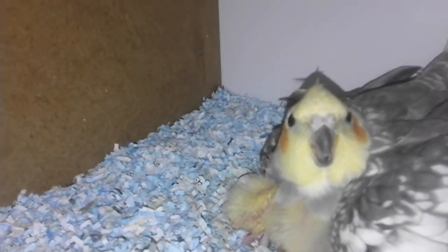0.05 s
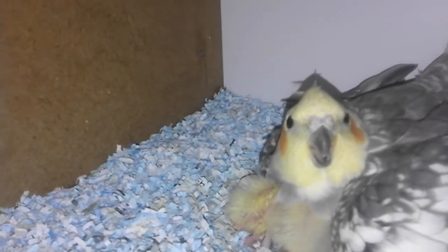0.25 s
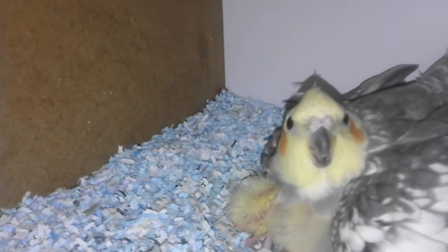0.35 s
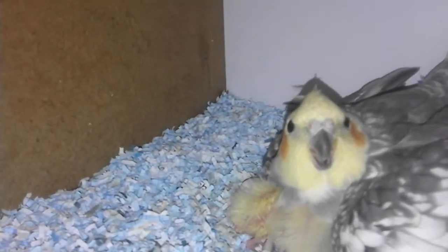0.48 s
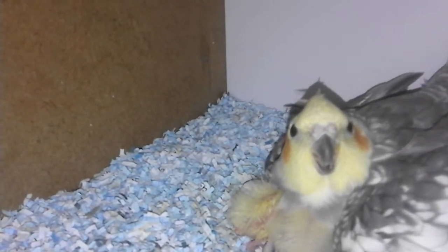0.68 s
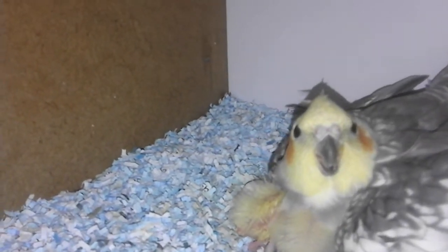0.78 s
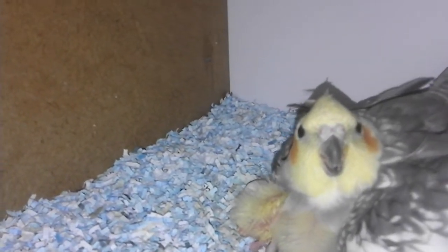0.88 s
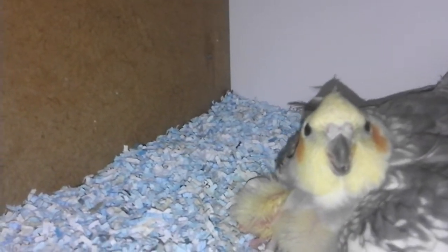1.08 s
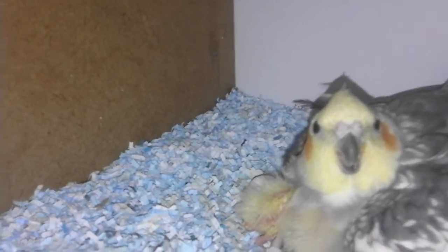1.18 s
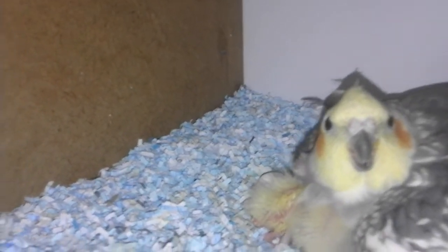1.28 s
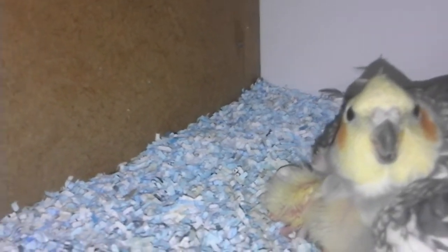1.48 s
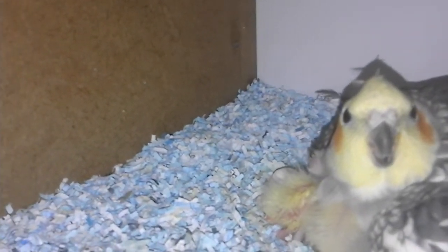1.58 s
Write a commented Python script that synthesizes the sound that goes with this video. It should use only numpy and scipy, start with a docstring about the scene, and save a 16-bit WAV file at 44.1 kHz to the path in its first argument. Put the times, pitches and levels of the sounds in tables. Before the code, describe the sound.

A cockatiel squawks harshly three times, close by in a wooden nest box. The second squawk is the longest and loudest and opens into a raspy hiss; the third is softer. A faint low hum wavers underneath.

```python
"""A low, wavering hum, and over it a cockatiel squawks three times, close by, in a wooden nest box.
One side of its voice organ, the syrinx, flutters wildly around a pitch that first rises.
In the first two squawks the other side adds a thin whistle above it. The long second squawk opens
into a raspy hiss of air through the beak. Bedding rustles faintly as the bird shifts,
and the box and the room ring on after each sound."""
import sys
import numpy as np
from scipy import signal
from scipy.fft import rfft, irfft
from scipy.io import wavfile
from scipy.ndimage import map_coordinates

SR = 44100
rng = np.random.default_rng(int(sys.argv[2]) if len(sys.argv) > 2 else 0)


def wav_out(sig):
    """Save sig, one row per channel (or a flat mono array), as 16-bit PCM at SR to the path in sys.argv[1]."""
    wavfile.write(sys.argv[1], SR, np.round(np.clip(np.atleast_2d(sig).T, -1, 1) * 32767).astype(np.int16))


N = 72765
T = np.arange(N) / SR

# The hum's loudness. Each row: time in seconds, level in dB.
HUM_LEVELS = [(0.0, -61), (0.174, -54.5), (0.274, -64.5), (0.412, -52.5), (0.542, -52), (0.684, -59.5),
              (0.812, -49.5), (0.946, -50), (1.116, -69), (1.268, -53.5), (1.392, -52.5), (1.442, -67),
              (1.57, -54.5), (1.65, -57)]
# Steady room noise, then a low noise that swells. Each row: frequency in Hz, relative level in dB.
ROOM_NOISE_COLOUR = [(25, -52), (45, 0), (65, -4.5), (82, -17), (100, 1), (120, -25), (145, -3.5),
                     (250, -1.5), (330, -11.5), (560, -13.5), (750, -21.5), (1200, -22), (2100, -15),
                     (3300, -71), (4200, -19.5), (5500, -51), (15500, -27)]
SWELL_NOISE_COLOUR = [(30, -18), (48, -22), (65, 3.5), (130, 3.5), (220, -0.5), (320, -9.5), (560, -3),
                      (1000, -8.5), (2000, -19), (12000, -28)]
# The swelling noise's loudness. Each row: time in seconds, level in dB.
SWELL_LEVELS = [(0, -64), (.2, -57.5), (.55, -54), (.92, -52), (1.12, -62.5), (1.35, -57), (1.65, -58)]
# The harsh voice, one list per squawk. Each row: time in seconds, pitch in Hz,
# flutter reach to either side in Hz, level in dB, overtone gain in dB.
SQUAWK_PATHS = [
    [(.168, 1500, 129.2, -54, -7), (.186, 1760, 160.1, -43.5, -8), (.215, 2020, 269.5, -39.5, -12),
     (.25, 2290, 420, -41.5, -12.5), (.295, 2290, 418, -44.5, -14.5), (.325, 2200, 284.2, -35, -24),
     (.36, 2190, 276, -36, -14), (.41, 2175, 248, -40, -13.5), (.44, 2076, 298, -53, -9)],
    [(.445, 1680, 221, -53.5, 7), (.468, 1850, 218.8, -42, 6), (.506, 1950, 259.7, -33, -5.5),
     (.512, 2158, 251, -30.5, -20), (.545, 2286, 397.2, -27.5, -34), (.59, 2390, 537.1, -36, -21),
     (.655, 2240, 397.3, -31, -23), (.76, 2230, 441.5, -34, -3), (.785, 1900, 221.2, -34.5, -21),
     (.828, 1901, 239, -34, -23), (.87, 2100, 454.3, -42, -3), (.98, 2021, 378, -52, -37)],
    [(1.229, 1837, 119.8, -55, -7.5), (1.25, 1853, 119.6, -44, -6), (1.263, 1988, 140.5, -39.5, -8.5),
     (1.29, 2073, 219.7, -41.5, -11), (1.335, 2296, 469.7, -41, -18), (1.385, 2327, 475.5, -45, -13),
     (1.43, 2293, 462, -52.5, -25)],
]
# Each row is one squawk's tone: change from one overtone to the next in dB, gain of its air in dB.
SQUAWK_TONES = [(-1.5, -30), (-8.5, -23.5), (-8, -29)]
# How the throat and open beak colour the overtones. Each row: frequency in Hz, gain in dB.
THROAT_COLOUR = [(2800, 4.5), (3300, -7), (3650, -0.5), (4200, 1), (4600, 1.5), (5100, -1.5), (5450, 2.5),
                 (5750, -7), (6050, -3), (6400, -2.5), (7300, -11.5), (9500, -18.5), (11200, -13.5),
                 (12000, -29), (13200, -23), (14600, -16), (17000, -32)]
# Air rushing out with the voice. Each row: frequency in Hz, relative level in dB.
AIR_COLOUR = [(300, -15), (550, 10.5), (750, -32), (1000, 16), (1400, 0), (2500, 16.5), (3300, -30),
              (4000, 6), (6000, 1), (8000, -11), (11500, -2), (15500, -8)]
# One list per whistle. Each row: time in seconds, pitch in Hz, flutter reach in Hz, level in dB.
WHISTLE_PATHS = [
    [(.236, 2700, 150.4, -48), (.258, 2960, 89.6, -33.5), (.275, 2977, 52, -31.5), (.3, 3022, 106.4, -40.5),
     (.345, 3010, 140, -48.5), (.38, 3130, 183, -44), (.41, 3098, 212, -41), (.445, 3100, 200, -54)],
    [(.53, 2520, 129.9, -58), (.572, 2850, 109.4, -34), (.597, 2880, 83.5, -29.5), (.63, 2800, 216, -52.5),
     (.71, 2780, 225, -39), (.79, 2600, 276, -55), (.85, 2900, 259.4, -42.5), (.885, 2920, 232, -44.5),
     (.94, 2850, 253, -71)],
]
# Rustles of bedding. Each row: time of the peak in seconds, fade time in seconds, level in dB.
BEDDING_RUSTLES = [(0.474, 0.026, -54.5), (1.437, 0.0052, -68), (1.558, 0.008, -68.5), (1.602, 0.017, -64)]
# The hiss. Each row: time in seconds, main beak resonance in Hz, level in dB.
HISS_PATH = [(.668, 3937, -61), (.69, 4074, -47.5), (.73, 4350, -48), (.775, 4646, -43),
             (.825, 4376, -39.5), (.86, 4415, -45), (.92, 4430, -54.5), (1.0, 4300, -92)]
# The hiss's peaks. Each row: ratio to the main resonance, width in Hz, relative level in dB.
BEAK_PEAKS = [(.91, 450, 1), (1, 586, 0.5), (1.109, 448, -2.5), (1.401, 1600, -11)]
# A hollow puff as the hiss begins. Each row: time in seconds, resonance in Hz, level in dB.
PUFF_PATH = [(.675, 1404, -51), (.7, 1154, -56.5), (.735, 845, -57.5), (.78, 803, -69)]
# Low notes of the box. Each row: pitch in Hz, seconds to fade by 60 dB, gain at that pitch in dB.
BOX_NOTES = [(548.4, 0.11, 12.5), (718, 0.25, 6)]

HUM_HZ, DRONE_HZ, DRONE_DB, ROOM_NOISE_DB = 173, 67, -63, -65.5
FLUTTER_DEPTH = 0.65  # how far the strength follows the flutter, from 0 to 1
RATTLE_HZ, HISS_RATTLE_DB = 103, 2  # fast, uneven shaking of the loudness
THROB_HZ, THROB_DB = 44, 1  # slower, uneven heaves of the voice
ONSET_AIR_DB, ONSET_AIR_S = 8, 0.033  # each squawk starts with extra air
BOX_ECHO_DB, ROOM_ECHO_DB = -3, -2.5
TREBLE_LIMIT_HZ = 15700


def gain(db):
    """Turn decibels into a number to multiply by."""
    return 10 ** (np.asarray(db) / 20)


def unit(x):
    """Scale a signal to an average power of 1."""
    return x / np.sqrt(np.mean(x ** 2))


def curve(rows, column=1):
    """Join the rows of a table by straight lines in time."""
    rows = np.array(rows)
    return np.interp(T, rows[:, 0], rows[:, column])


def gate(rows, fade_s=0.0066):
    """On from a table's first time to its last, with short fades outside."""
    return np.clip(1 + np.minimum(T - rows[0][0], rows[-1][0] - T) / fade_s, 0, 1)


def noise(shape):
    """Noise whose strength at each frequency f is set by shape(f)."""
    hz = np.fft.rfftfreq(N, 1 / SR) + 1
    return unit(irfft(rfft(rng.standard_normal(N)) * shape(hz), N))


def coloured_noise(rows):
    """Noise that follows a table of frequencies and levels."""
    hz, db = np.array(rows).T
    return noise(lambda f: gain(np.interp(np.log(f), np.log(hz), db)))


def band(hz, width_hz):
    """Noise that is strongest around one frequency."""
    return noise(lambda f: 1 / (1 + ((f * f - hz * hz) / (f * width_hz)) ** 2))


def wobble(hz):
    """An uneven swing at roughly this rate."""
    return band(hz, hz * 2)


def moving_band(hz, width_hz):
    """A band of noise whose centre glides."""
    a, b = (noise(lambda f: 1 / (1 + (2 * f / width_hz) ** 2)) for _ in range(2))
    phase = 2 * np.pi * np.cumsum(hz) / SR
    return a * np.cos(phase) + b * np.sin(phase)


def background():
    """A wavering hum, a deeper drone and quiet room noise that swells."""
    def tone(hz, drift):
        pitch = hz * (1 + drift * wobble(hz=4))
        return np.sqrt(2) * np.sin(2 * np.pi * np.cumsum(pitch) / SR)
    hum = gain(curve(HUM_LEVELS)) * tone(HUM_HZ, drift=0.0036)
    drone = gain(DRONE_DB) * tone(DRONE_HZ, drift=0.026)
    steady = gain(ROOM_NOISE_DB) * coloured_noise(ROOM_NOISE_COLOUR)
    swell = gain(curve(SWELL_LEVELS)) * coloured_noise(SWELL_NOISE_COLOUR)
    return hum + drone + steady + swell


def flutter(reach_hz):
    """Wild swings of phase and strength that smear a tone about reach_hz to either side."""
    base_hz = 500
    position = [np.cumsum(np.abs(reach_hz)) / base_hz]  # more reach runs through the noise faster
    slow_noises = (noise(lambda f: 1 / (1 + (f / base_hz) ** 16)) for _ in range(2))
    a, b = (map_coordinates(x, position, order=1, mode="mirror") for x in slow_noises)
    return np.arctan2(b, a), unit(np.hypot(a, b) ** FLUTTER_DEPTH)


def throat(x):
    """The throat and beak boost some frequencies and weaken others."""
    hz, db = np.array(THROAT_COLOUR).T
    response = gain(np.interp(np.fft.rfftfreq(N, 1 / SR), hz, db))
    return irfft(rfft(x) * response, N)


def syrinx(hz, reach_hz, rattle_db, overtone_db, fall_db):
    """A membrane flutters around its pitch and rattles. Returns the tone and its bursts of loudness."""
    swing, strength = flutter(reach_hz)
    phase = 2 * np.pi * np.cumsum(hz) / SR + swing
    rattle = 2 * np.tanh(band(RATTLE_HZ, RATTLE_HZ) / 2)  # tanh softens the biggest jolts
    throb = band(THROB_HZ, THROB_HZ)
    bursts = unit(gain(rattle_db * rattle + THROB_DB * throb))
    overtones = sum(gain(fall_db * (k - 1)) * np.sin(k * phase) for k in range(2, 7))
    tone = np.sin(phase) + gain(overtone_db) * throat(overtones)
    return np.sqrt(2) * bursts * strength * tone, bursts


def squawks():
    """One side of the syrinx makes the harsh voice, and air rushes out in the same bursts."""
    out = 0
    for rows, (fall_db, air_db) in zip(SQUAWK_PATHS, SQUAWK_TONES):
        hz, reach_hz, db, overtone_db = (curve(rows, k) for k in range(1, 5))
        tone, bursts = syrinx(hz, reach_hz, rattle_db=3.5, overtone_db=overtone_db, fall_db=fall_db)
        onset = np.exp(-((T - rows[0][0]) / ONSET_AIR_S) ** 2)
        air = gain(air_db + ONSET_AIR_DB * onset) * bursts * coloured_noise(AIR_COLOUR)
        out = out + gate(rows) * gain(db) * (tone + air)
    return out


def box_ring(x):
    """The air in the box rings at two low pitches."""
    ring = 0
    for hz, ring_s, db in BOX_NOTES:
        fade = gain(-60 * T / ring_s)
        ring = ring + gain(db) * 2 * fade / fade.sum() * np.cos(2 * np.pi * hz * T)
    return x + signal.fftconvolve(x, ring)[:N]


def echoes(x):
    """Sound bounces quickly around the box, then rings longer and duller in the room."""
    def tail(ring_s, delay_s, top_hz):
        wash = noise(lambda f: 1 / np.hypot(1, (f / top_hz) ** 2))
        echo = wash * gain(-60 * T / ring_s) * (T > delay_s)
        return echo / np.sqrt(np.sum(echo ** 2) * SR / 2 / top_hz)
    box = gain(BOX_ECHO_DB) * tail(ring_s=0.093, delay_s=0.00088, top_hz=8000)
    room = gain(ROOM_ECHO_DB) * tail(ring_s=0.39, delay_s=0.0091, top_hz=4630)
    reflected = signal.fftconvolve(x, box + room)[:N]
    return (x + reflected) / np.sqrt(1 + gain(BOX_ECHO_DB) ** 2)


def whistles():
    """The other side of the syrinx adds a thin, higher tone."""
    out = 0
    for rows in WHISTLE_PATHS:
        hz, reach_hz, db = (curve(rows, k) for k in range(1, 4))
        tone, _ = syrinx(hz, reach_hz, rattle_db=-1, overtone_db=-18, fall_db=-0.5)
        out = out + gate(rows) * gain(db) * tone
    return out


def bedding():
    """Paper bedding gives faint, crackly swishes as the bird shifts."""
    swishes = sum(gain(db) * np.exp(-((T - peak_s) / fade_s) ** 2)
                  for peak_s, fade_s, db in BEDDING_RUSTLES)
    crackle = band(hz=6050, width_hz=3400) * gain(4.5 * wobble(hz=300))
    return swishes * unit(crackle)


def hiss():
    """Air rasps through the resonances of the beak, starting with a hollow, falling puff."""
    air = sum(gain(db) * moving_band(ratio * curve(HISS_PATH), width_hz)
              for ratio, width_hz, db in BEAK_PEAKS)
    rattle = gain(HISS_RATTLE_DB * wobble(RATTLE_HZ))
    rasp = gate(HISS_PATH) * gain(curve(HISS_PATH, 2)) * unit(air * rattle)
    puff = gate(PUFF_PATH) * gain(curve(PUFF_PATH, 2)) * moving_band(curve(PUFF_PATH), width_hz=310)
    return rasp + puff


def scene():
    """The bird in its box over the room's background, in one channel."""
    bird = squawks() + whistles() + hiss() + bedding()
    return (echoes(box_ring(bird)) + background())[None]


def record(dry):
    """Cut away the very highest treble."""
    return signal.sosfilt(signal.ellip(10, .2, 70, TREBLE_LIMIT_HZ, fs=SR, output="sos"), dry)


dry = scene()
out = record(dry)
wav_out(out)
```